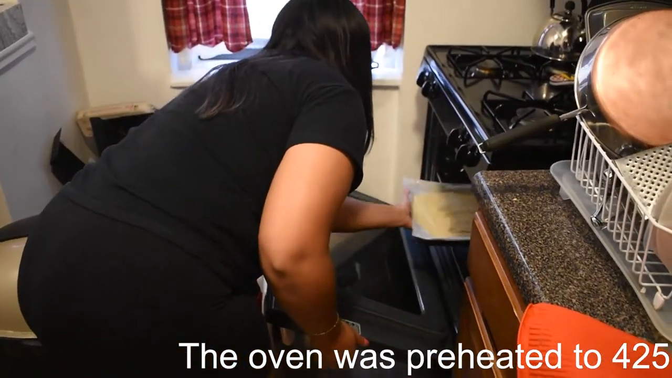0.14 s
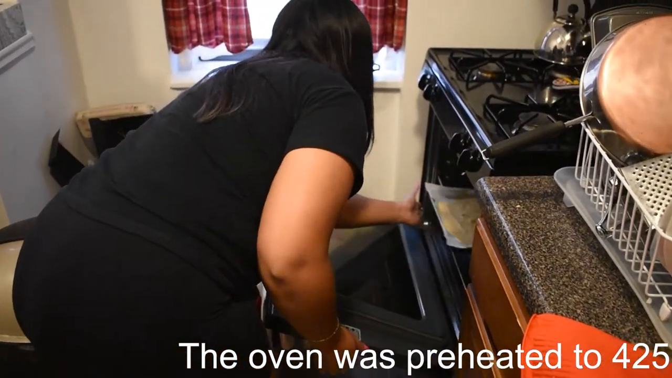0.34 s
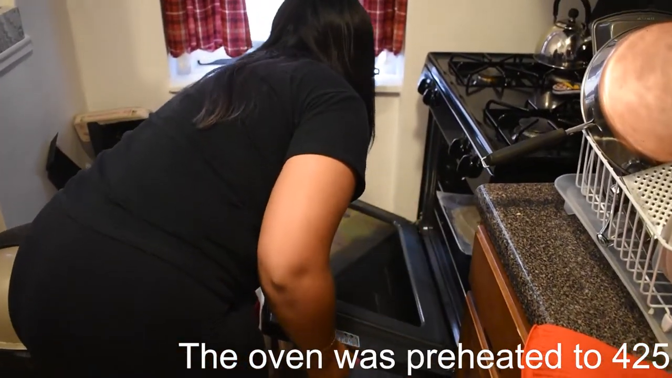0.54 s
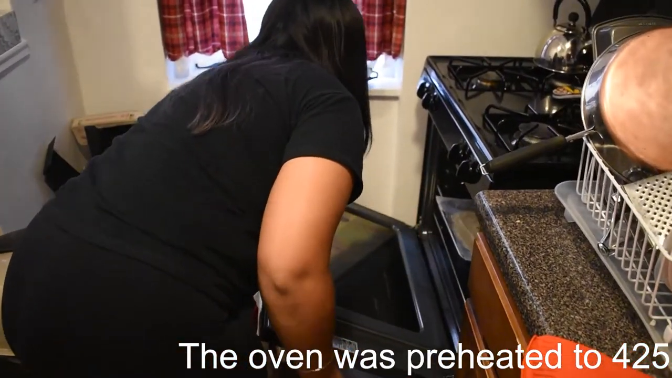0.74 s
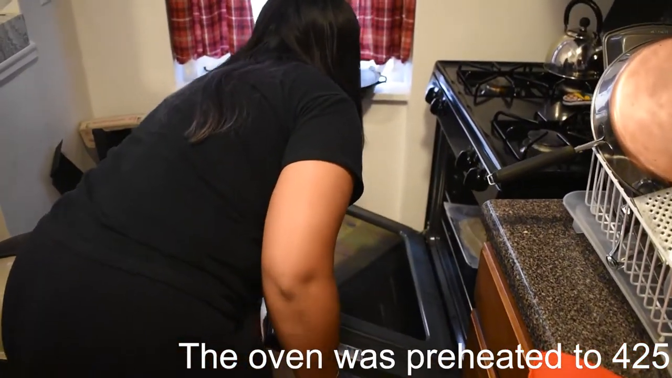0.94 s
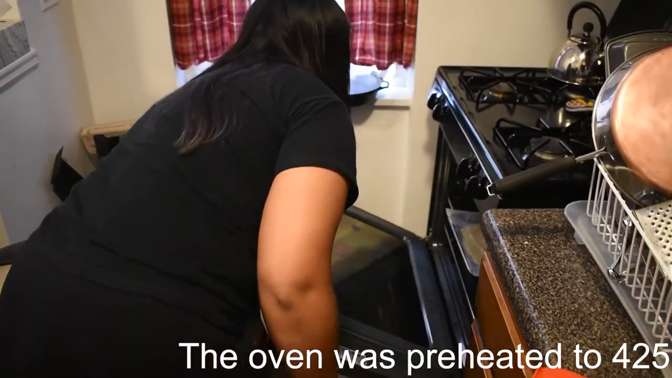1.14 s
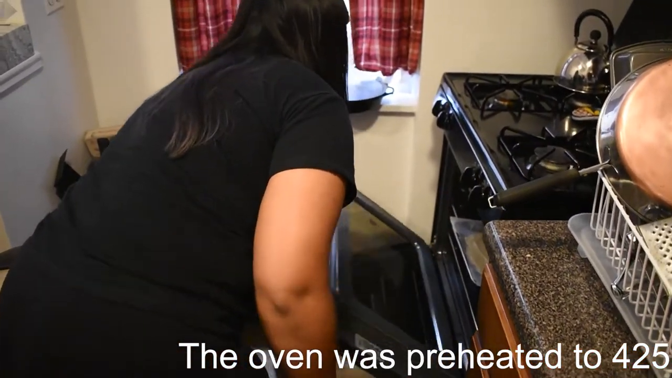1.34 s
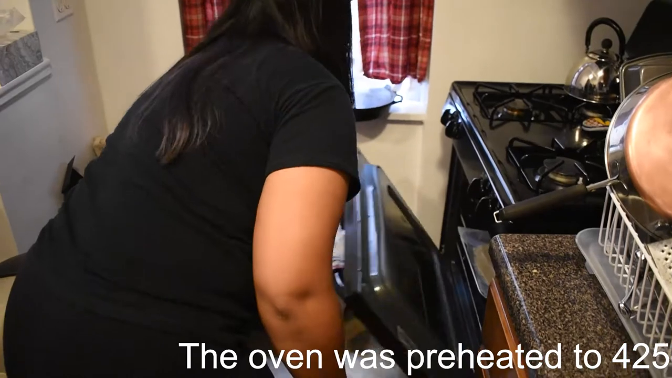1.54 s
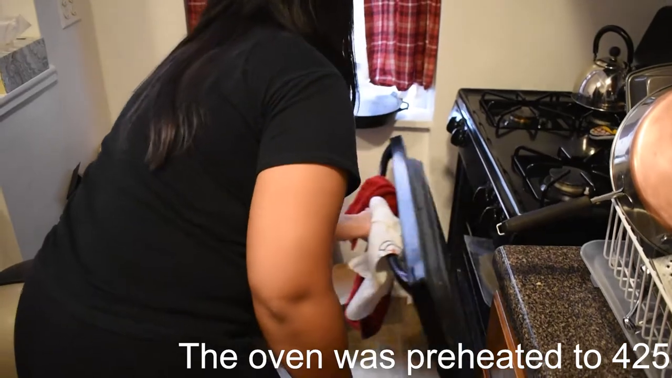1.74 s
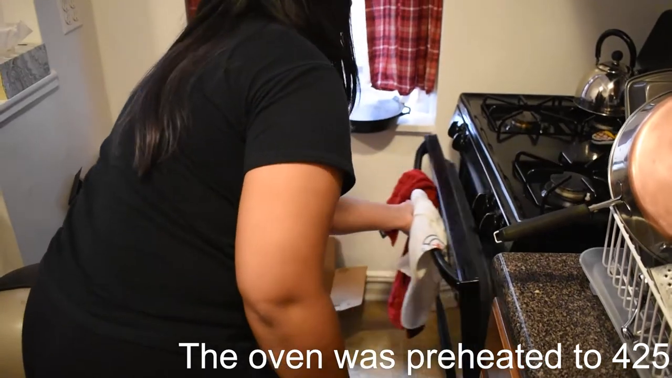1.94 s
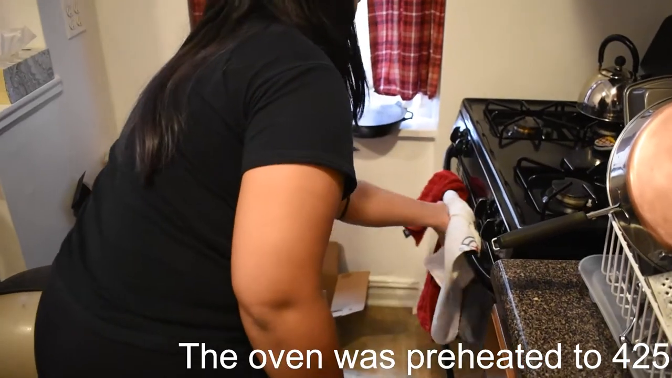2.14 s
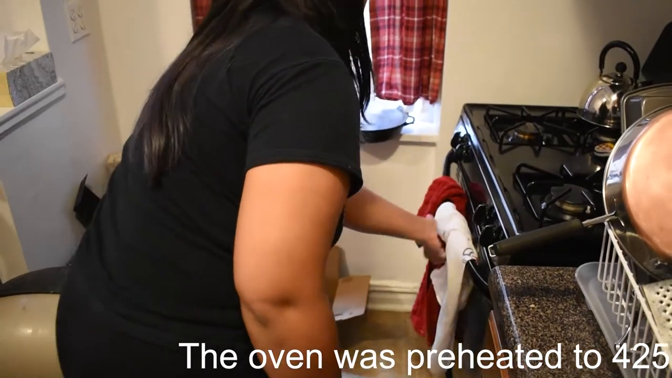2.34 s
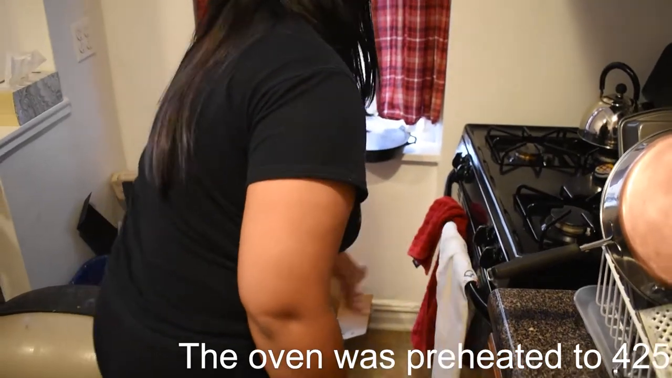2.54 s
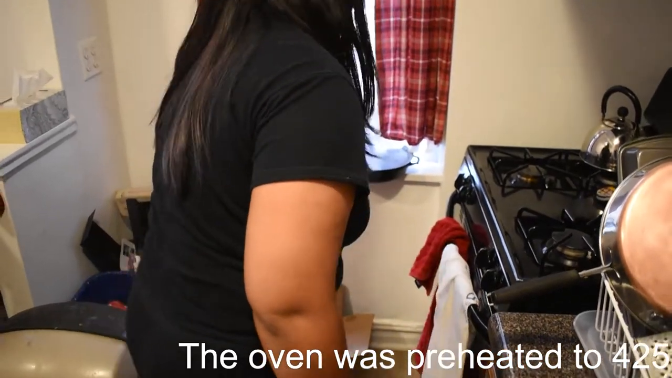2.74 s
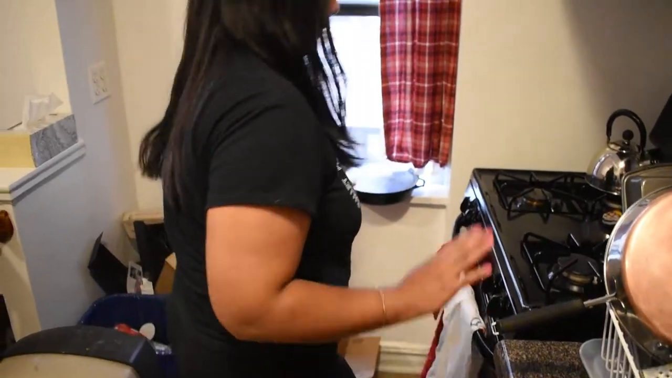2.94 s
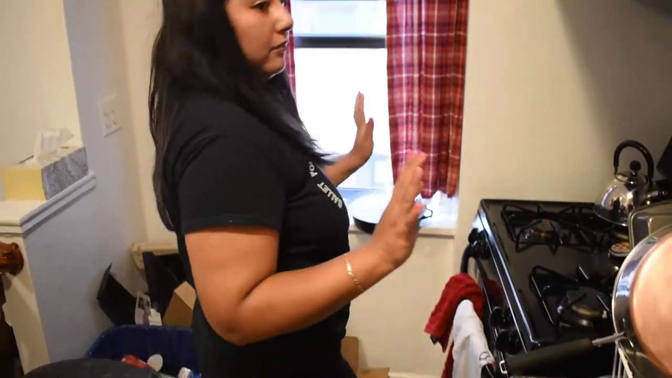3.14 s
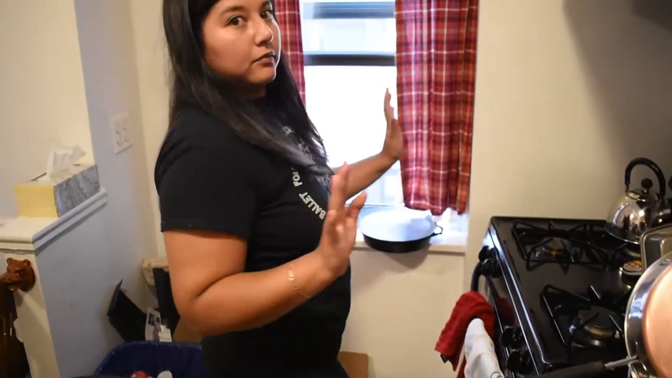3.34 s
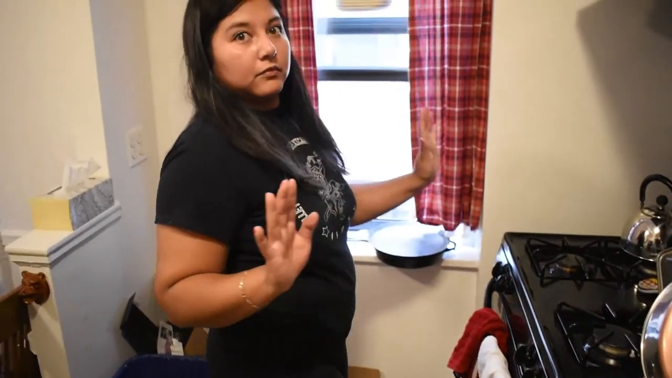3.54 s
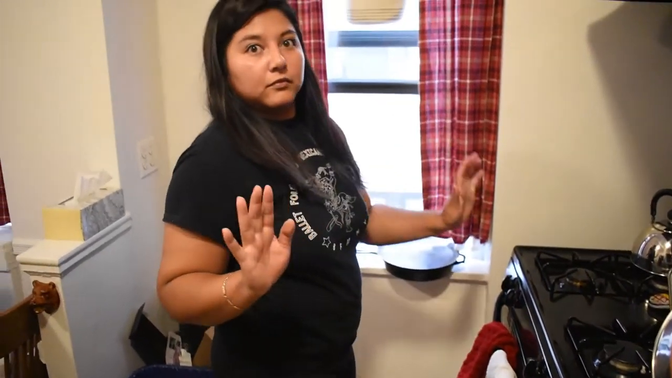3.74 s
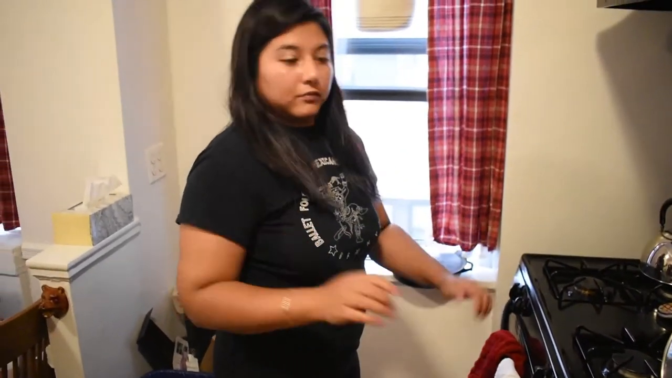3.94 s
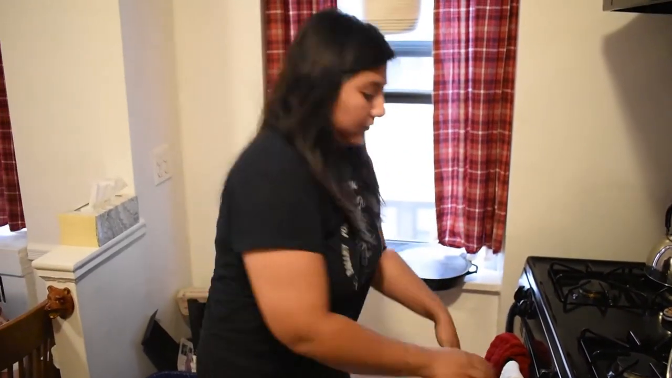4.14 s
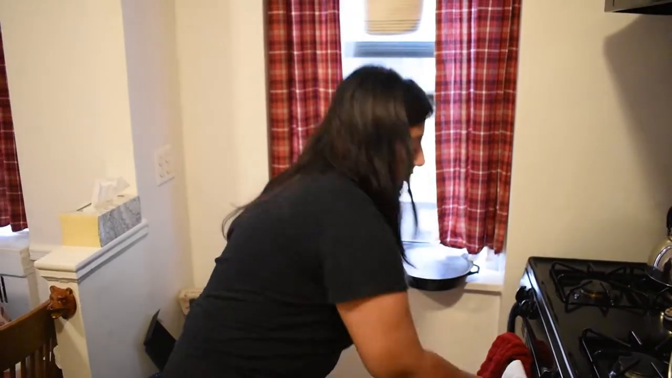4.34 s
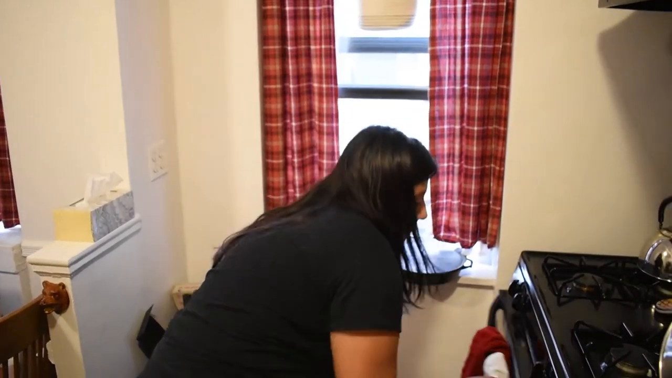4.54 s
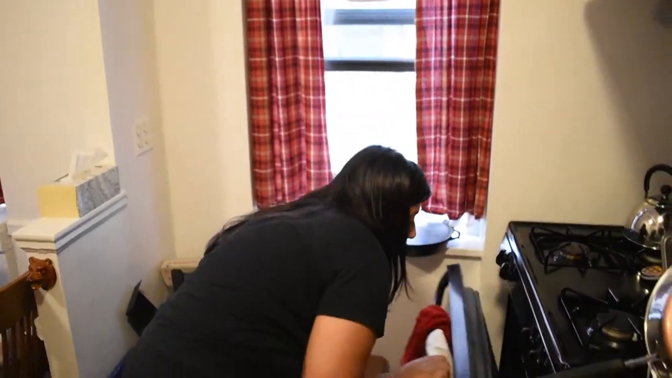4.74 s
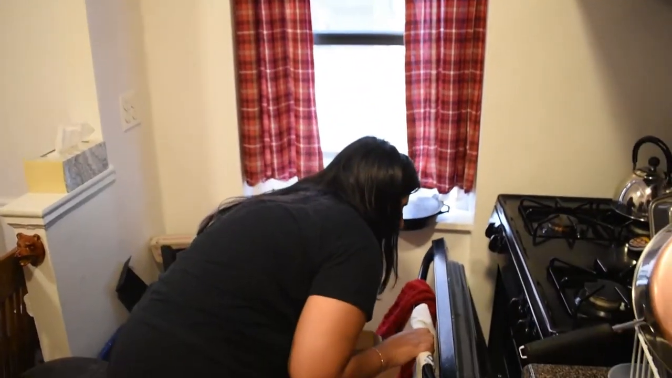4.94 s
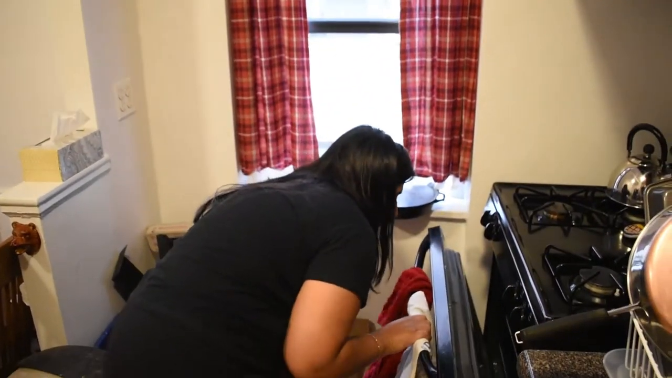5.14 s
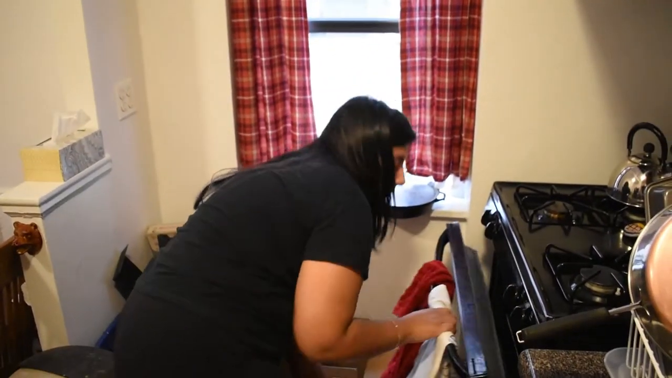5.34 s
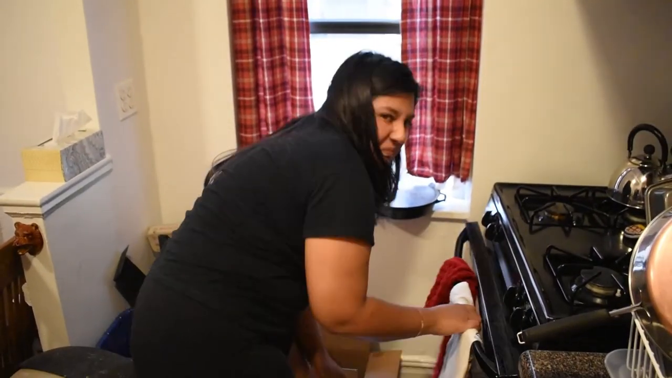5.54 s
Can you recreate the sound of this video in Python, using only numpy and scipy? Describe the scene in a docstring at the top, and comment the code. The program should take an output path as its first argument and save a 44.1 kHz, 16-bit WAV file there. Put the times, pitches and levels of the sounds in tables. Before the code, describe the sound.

A metal baking pan scrapes along an oven rack and drops into place with a clank, leaving the wires ringing. The door springs tick, and the oven door shuts with a loud sheet-metal clatter and a low boom. A bracelet tinkles very faintly, then the door is pulled ajar with rubbing hinges and dull knocks. The small kitchen has a thin steady whine, and the hand-held microphone rumbles slightly.

```python
"""Baking pan and oven door

A metal pan scrapes along an oven rack by stick-slip friction and drops onto it; the wires ring on.
The door swings up on rubbing hinges and ticking springs, shuts with a clatter of sheet metal and a
boom of the oven shell, and later is pulled ajar. The small kitchen reverberates and has a thin
steady whine; a bracelet tinkles, and the hand-held microphone rumbles as it sways."""
import sys
import numpy as np
from scipy import signal
from scipy.fft import rfft, irfft, next_fast_len
from scipy.io import wavfile

SR = 44100
rng = np.random.default_rng(int(sys.argv[2]) if len(sys.argv) > 2 else 0)


def log_audio(samples):
    """Write samples as a 16-bit WAV file to the path given in sys.argv[1]."""
    # one column per channel
    frames = np.atleast_2d(samples).T
    # limit to full scale, then quantise
    limited = np.clip(frames, -1, 1)
    pcm = np.round(limited * 32767).astype(np.int16)
    wavfile.write(sys.argv[1], SR, pcm)


N = 246553
TIME = np.arange(N) / SR
TAIL = TIME[:SR + SR // 2]
PAN_DROP_S, DOOR_SLAM_S = 0.524, 2.286


def from_db(db):
    """Amplitude grows tenfold with every 20 dB."""
    return 10 ** (np.asarray(db) / 20)


def rms_one(x):
    """Division by the root mean square gives unit power."""
    return x / np.sqrt(np.mean(x ** 2) + 1e-20)


def at_hz(points, hz):
    """Interpolation along log frequency reads a curve between its points."""
    return np.interp(np.log(hz), np.log(np.array(points)[:, 0]), np.array(points)[:, 1])


def coloured(x, colour):
    """Linear filtering weights the spectrum by a colour; the result has unit power."""
    size = next_fast_len(N)
    hz = np.arange(size // 2 + 1) * SR / size + 1e-3
    return rms_one(irfft(rfft(x, size) * from_db(at_hz(colour, hz)), size)[:N])


def drift(rate_hz):
    """Low-pass noise wanders slowly, with unit spread."""
    return coloured(rng.standard_normal(N), [(rate_hz, 0), (4 * rate_hz, -40), (40 * rate_hz, -120)])


def add(out, s, sound):
    """Superposition: a sound adds to the mix from time s on."""
    i = max(round(s * SR), 0)
    out[i:i + len(sound)] += sound[:N - i]


def rub(gain, colour, slips_per_s, spread_db, ring_s, contacts=6):
    """Stick-slip friction: random slips at several contacts each set the metal ringing briefly."""
    out, t = 0, TAIL[:SR // 4]
    for _ in range(contacts):
        slipping = rng.random(N) < slips_per_s / contacts / SR
        slips = slipping * rng.choice([-1, 1], N) * from_db(spread_db * rng.standard_normal(N))
        metal = rng.standard_normal(len(t)) * from_db(-60 * t / ring_s)
        out = out + signal.oaconvolve(slips, metal)[:N]
    return gain * coloured(out, colour)


def ring(modes, t):
    """Free vibration is a sum of damped sines, here each of random strength and sign."""
    strengths = from_db(rng.normal(0, 2.44, len(modes))) * rng.choice([-1, 1], len(modes))
    return sum(strength * from_db(db - 60 * t / t60) * np.sin(2 * np.pi * hz * t)
               for strength, (hz, db, t60) in zip(strengths, modes))


def dense_ring(colour, t60s, bright_db, length):
    """Overlapping modes merge into noise that starts at unit power and decays band by band."""
    edges = np.geomspace(90, 18000, 24)
    white, out, power = rng.standard_normal((2, len(TAIL))), 0, 0
    for k, (low, high) in enumerate(zip(edges, edges[1:])):
        hz = np.sqrt(low * high)
        bandpass = signal.butter(2, [low, high], "band", fs=SR, output="sos")
        band = rms_one(signal.sosfilt(bandpass, white[k % 2]))
        gain = from_db(at_hz(colour, hz) + bright_db * np.log2(hz)) * np.sqrt(high - low)
        out = out + gain * band * from_db(-60 * TAIL / (at_hz(t60s, hz) * length))
        power += gain ** 2
    return out / np.sqrt(power)


def ring_length(db, full_blow_db=-15, halving_db=33):
    """A stronger blow rings longer: its level sets a factor on the decay time."""
    return 2 ** ((db - full_blow_db) / halving_db)


def chatter(decay_s, bounce_db, per_s=450):
    """Rebound: one contact is followed by weakening random bounces; the force has unit energy."""
    t = TIME[:SR // 8]
    bounces = (rng.random(len(t)) < per_s / SR) * rng.standard_normal(len(t))
    force = bounces * from_db(bounce_db) * np.exp(-t / max(decay_s, 1e-3))
    force[0] = 1
    return force / np.linalg.norm(force)


def blows(table, colour, chatter_s, ring_share, crack_db, crack_s, bounce_db, rise_s,
          modes=(), modes_db=0, mode_t60=0):
    """Impact excitation: each blow cracks, chatters and leaves the sheet metal ringing."""
    # Each row: frequency in Hz, unscaled time to decay by 60 dB in seconds.
    metal_t60 = [(150, 1), (400, 0.89), (1200, 0.63), (3500, 0.6), (7000, 0.54), (14000, 0.27)]
    out = np.zeros(N)
    rise = 1 - np.exp(-TAIL / rise_s)   # the shock spreads through the sheet
    onset = rise * (1 + from_db(crack_db) * np.exp(-TAIL / crack_s))
    for s, db, bright_db in table:
        length = max(ring_share * ring_length(db), .05)
        body = onset * dense_ring(colour, metal_t60, bright_db, length)
        force = chatter(chatter_s * 2 ** -bright_db, bounce_db)   # a hard, bright contact chatters less
        add(out, s, from_db(db) * signal.fftconvolve(body, force))
        if modes:
            # high modes die sooner, and a soft blow hardly reaches them
            struck = [(hz, mode_db + bright_db * np.log2(hz / 2000),
                       mode_t60 * length * (2000 / hz) ** .15) for hz, mode_db in modes]
            add(out, s, from_db(db + modes_db) * ring(struck, TAIL[:SR]))
    return out


def pan():
    """Friction and impact excite the pan as it scrapes along the rack, knocks and drops into place."""
    # Each row: start in seconds, relative level in dB, brightness in dB per octave.
    knocks = [(0.024, -29.5, 0), (0.055, -31, -1.5), (0.4185, -43.5, 8), (0.5215, -16.5, 1.5),
              (0.535, -16, 0)]
    # Each row: frequency of a strong sheet-metal mode in Hz, relative level in dB.
    modes = [(538, -7), (623, -8), (773, 5), (870, 1), (1174, 3), (1257, 0), (1324, -2), (1379, 1),
             (1529, 9), (1599, -2), (1847, -9), (1893, -2), (2006, -1), (2181, -18), (2372, 0), (2824, -15),
             (3735, 0), (3831, 5), (4173, -7), (4623, -12), (5073, -9), (5852, 1)]
    # Each row of both spectra: frequency in Hz, relative spectral density in dB.
    scrape_colour = [(41, -48), (70, -17), (208, -2.5), (261, -10), (401, 3), (590, -10), (1490, -5.5),
                     (1750, -7), (3160, -13.5), (3870, -8), (4640, -21.5), (5440, -17.5), (15800, -41.5)]
    knock_colour = [(70, -21), (120, -8), (175, -3.5), (240, -6.5), (400, -6.5), (560, -3), (780, -5.5),
                    (950, -7.5), (1280, -1), (1600, -4.5), (2700, -9.5), (3900, -8), (5500, -13),
                    (7500, -22.5), (11000, -24.5), (15800, -26)]
    shove = from_db(-23 - 85 * TIME)   # the pan is shoved in and slows down
    glide = from_db(-43) * (TIME < PAN_DROP_S)
    scrape = rub(np.hypot(shove, glide), scrape_colour, slips_per_s=1000, spread_db=1.5, ring_s=0.075)
    return scrape + blows(knocks, knock_colour, chatter_s=0.012, ring_share=0.82,
                          crack_db=3, crack_s=0.0073, bounce_db=-6.5, rise_s=0.0018,
                          modes=modes, modes_db=-17, mode_t60=0.35)


def rack(slide_db=-8.5, waver_db=2.0, waver_hz=7.2):
    """Beating: lightly damped wires of nearly equal pitch interfere; their level also wavers."""
    # Each row: frequency in Hz, level in dB after the pan and after the door, decay time in seconds.
    wires = [(275.3, -50.5, -42, 2.8), (308.2, -40, -41, 3.8), (325.8, -52, -37.5, 4.8),
             (332, -48.5, -35.5, 3.86), (336, -50, -43, 3.5), (366, -43, -34, 1.76), (697, -55.5, -56, 5.3),
             (892, -40, -44, 1.5), (885, -39, -44.5, 2.64), (895, -39.5, -48, 1.8), (919, -43.5, -41, 2.3),
             (1750, -43.5, -43, 1.33), (1730, -38, -47, 1.3), (1773, -47.5, -45.5, 2.16),
             (2864, -47, -55, 1.3), (2907, -40, -43.5, 0.96)]
    out, t = np.zeros(N), TIME[:3 * SR]
    by_pan = [(hz, pan_db, t60) for hz, pan_db, door_db, t60 in wires]
    by_door = [(hz, door_db, t60) for hz, pan_db, door_db, t60 in wires]
    add(out, 0, from_db(slide_db) * ring(by_door, t))   # sliding shakes the whole rack, as the door does
    add(out, PAN_DROP_S, ring(by_pan, t))
    add(out, DOOR_SLAM_S, ring(by_door, t))
    return out * from_db(waver_db * drift(waver_hz))


def room_air(db=-48):
    """Stationary broadband noise forms the kitchen's ambient floor."""
    # Each row: frequency in Hz, relative spectral density in dB.
    colour = [(41, -42), (70, -10), (145, -4.5), (190, -5), (238, -4.5), (300, -2.5), (420, -6.5),
              (564, -6.5), (887, -13), (1400, -14.5), (2000, -22.5), (2900, -25), (3600, -21.5),
              (4300, -27), (5600, -26.5), (7500, -33.5), (15800, -39)]
    return from_db(db) * coloured(rng.standard_normal(N), colour)


def appliance_hum(waver_db=2.5, waver_hz=1.57):
    """Pure appliance tones hum and whine under a slow, shared amplitude modulation."""
    # Each row: frequency in Hz, level in dB about which the tone wavers.
    tones = [(119, -62.5), (156, -70.5), (237, -62), (463, -75), (3499, -67)]
    hum = sum(np.sqrt(2) * from_db(db) * np.sin(2 * np.pi * (hz * TIME + rng.random()))
              for hz, db in tones)
    return hum * from_db(waver_db * drift(waver_hz))


def microphone_sway(rest_db=-30, width_s=0.24):
    """Handling noise: a largely infrasonic rumble swells as the hand moves the microphone."""
    # Each row: time of a movement's peak in seconds, level in dB.
    sways = [(0.15, -21), (1.65, -20.5), (2.65, -26)]
    # Each row: frequency in Hz, relative spectral density in dB.
    colour = [(3, -23), (7, -10), (12, 0), (16, -2), (23, -65), (33, -18.5), (50, -31), (80, -47.5),
              (160, -89)]
    sway_power = sum(from_db(db) ** 2 * np.exp(-((TIME - s) / width_s) ** 2) for s, db in sways)
    return np.sqrt(from_db(rest_db) ** 2 + sway_power) * coloured(rng.standard_normal(N), colour)


def hinges(rise_db_per_s=194, fall_db_per_s=124):
    """Hinge friction follows the door's speed; the arms catch in dull impacts as it is pulled ajar."""
    # The door is closed, grabbed and pulled ajar.
    # Each row: time of reaching full speed in seconds, hold in seconds, relative level in dB.
    swings = [(1.523, 0.6, -54), (4.545, 0.0092, -39.5), (4.798, .15, -38)]
    # Each row: start in seconds, relative level in dB, brightness in dB per octave.
    knocks = [(4.539, -35, 0.5), (4.928, -27.5, -0.4), (4.956, -27.5, -2.5), (4.989, -27.5, -0.1)]
    # Each row of both spectra: frequency in Hz, relative spectral density in dB.
    rub_colour = [(88, -35), (150, -1), (291, -2), (382, 1), (474, -17), (575, -6), (955, -16.5),
                  (1380, -14), (3590, -19), (15800, -44)]
    knock_colour = [(90, 1.5), (140, 4), (190, 2), (250, -13), (330, -3.5), (500, -8.5), (900, -7.5),
                    (1400, -11), (2000, -18.5), (2700, -22), (3700, -21.5), (6000, -45), (15800, -57)]
    speed = sum(from_db(db - rise_db_per_s * np.maximum(s - TIME, 0)
                        - fall_db_per_s * np.maximum(TIME - s - hold_s, 0)) for s, hold_s, db in swings)
    rubbing = rub(speed, rub_colour, slips_per_s=1200, spread_db=2.5, ring_s=0.065)
    return rubbing + blows(knocks, knock_colour, chatter_s=0.0042, ring_share=0.38,
                           crack_db=0, crack_s=0.0037, bounce_db=-5.0, rise_s=0.00072)


def springs(recoil_s=.021, loss_db=4.5, dulling_db=4.5):
    """Elastic recoil: as their load changes the door springs tick, then answer softer and duller."""
    # Each row: start in seconds, relative level in dB, brightness in dB per octave.
    ticks = [(1.664, -41, 2.0), (1.884, -39, -1.5), (2.663, -35, 0.5)]
    # Each row: frequency in Hz, relative spectral density in dB.
    colour = [(150, -0.5), (700, 0.5), (1400, 3), (2000, -2.5), (3000, -2), (4500, -9.5), (7000, -20.5),
              (15800, -30)]
    recoils = [(s + recoil_s, db - loss_db, bright_db - dulling_db) for s, db, bright_db in ticks]
    return blows(ticks + recoils, colour, chatter_s=0.002, ring_share=0.86,
                 crack_db=0, crack_s=0.0041, bounce_db=-6, rise_s=0.00046)


def door():
    """Impacts excite plate modes: the catch clacks, the door judders, slams on the stove and rebounds."""
    # Each row: start in seconds, relative level in dB, brightness in dB per octave.
    slam = [(2.2835, -12.5, 1.2), (2.304, -17.5, 0.2), (2.388, -26, -2)]
    catch = [(2.1145, -17, -.5)]
    # evenly spaced bumps, each stronger and duller than the last
    judder = [(2.141 + .03 * k, -20.5 + .8 * k, 1.13 - .77 * k) for k in range(4)]
    # Each row: frequency of a strong sheet-metal mode in Hz, relative level in dB.
    modes = [(362, 0.5), (424, -1), (507, -1.5), (691, -6), (860, 0.5), (1132, -10), (1207, -4),
             (1288, -14.5), (1410, 6), (1463, 6), (1774, -35), (2014, -10), (2093, -23), (2250, 4.5),
             (2366, -14), (2534, 0), (2777, -6), (2838, -30), (3435, 2), (3806, 4.5), (4374, -62),
             (4866, -32)]
    # Each row: frequency in Hz, relative spectral density in dB.
    colour = [(70, -24), (125, -4), (165, -2), (240, -3), (320, -5.5), (390, -2.5), (520, -5.5), (730, -8),
              (1000, -8), (1300, -4.5), (1800, -8.5), (2300, -8), (3000, -11), (3900, -12), (4700, -11.5),
              (5500, -17), (7500, -25.5), (11000, -32), (15800, -37)]
    clack = blows(catch, colour, chatter_s=.0013, ring_share=0.58,
                  crack_db=1.5, crack_s=0.0043, bounce_db=-9.0, rise_s=0.0019,
                  modes=modes, modes_db=-20.5, mode_t60=0.53)
    return clack + blows(judder + slam, colour, chatter_s=0.013, ring_share=0.97,
                         crack_db=1.5, crack_s=0.0038, bounce_db=-7.5, rise_s=0.0017,
                         modes=modes, modes_db=-21.0, mode_t60=0.62)


def shell(contact_s=0.003, ring_share=.85):
    """The door's weight, a half-sine force pulse, drives the oven shell's low modes into a boom."""
    # Each row: start in seconds, relative level in dB.
    thuds = [(2.115, -13.5), (2.179, -12.5), (2.389, -25), (4.926, -29.5)]
    # Each row: frequency in Hz, relative level in dB, unscaled decay time in seconds.
    modes = [(50.6, -4, 0.61), (60, -11, 1), (65.57, -3, 0.89), (76.9, -4, 0.49), (92, -4.5, 0.44),
             (115.5, 0, 0.55), (141.2, -15, 0.31), (188.4, -2.5, 0.21), (233, -5.5, 0.16),
             (273.2, -3.5, 0.7)]
    out = np.zeros(N)
    push = np.sin(np.pi * np.minimum(TIME[:SR // 20] / contact_s, 1))
    for s, db in thuds:
        length = ring_share * ring_length(db)
        boom = sum((-1) ** k * from_db(mode_db - 60 * TAIL / (t60 * length))
                   * np.sin(2 * np.pi * hz * TAIL) for k, (hz, mode_db, t60) in enumerate(modes))
        add(out, s, from_db(db) * signal.fftconvolve(boom, push / push.sum()))
    return out


def bracelet(span_s=(3.15, 4.5), pitch_hz=(5390, 9700), db=-62.5, t60_s=.02, touches=10, links=12):
    """Small bodies ring high: tiny links, each with its own pitch, touch at random as the arm moves."""
    out = np.zeros(N)
    for s in rng.uniform(*span_s, touches):
        modes = [(hz, db, t60_s) for hz in rng.uniform(*pitch_hz, links)]
        add(out, s, ring(modes, TAIL[:SR // 8]))
    return out


def kitchen(x, wet_db=-10.5, first_echo_s=0.0057):
    """Reverberation: reflections from close walls add a short diffuse tail."""
    # Each row: frequency in Hz, unscaled reverberation time in seconds.
    room_t60 = [(150, 0.3), (1500, 0.71), (6000, 0.2), (14000, 0.33)]
    echo = dense_ring([(100, 5.6), (5000, 3.2), (16000, 3)], room_t60, bright_db=0, length=0.97)
    echo *= TAIL > first_echo_s
    return x + from_db(wet_db) * signal.fftconvolve(x, echo / np.linalg.norm(echo))[:N]


def scene():
    """All sources superpose in one channel; the clatter and the bracelet also reverberate."""
    metal = pan() + door() + springs() + hinges()
    near = kitchen(from_db(-1.0) * metal + bracelet())
    return (near + shell() + rack() + room_air() + appliance_hum() + microphone_sway())[None]


def record(dry, cutoff_hz=15950):
    """Soft saturation rounds the peaks, and a steep low-pass filter cuts the top."""
    rounded = 1.226 * np.tanh(dry / 1.175)
    return signal.sosfilt(signal.ellip(12, .1, 80, cutoff_hz, fs=SR, output="sos"), rounded)


dry = scene()
out = record(dry)
log_audio(out)
```